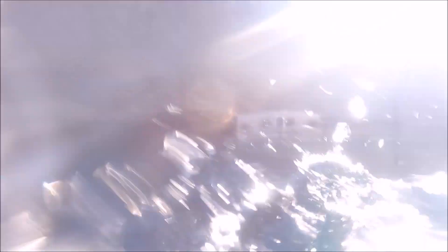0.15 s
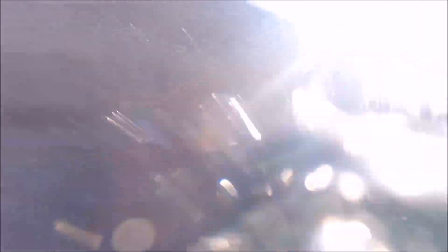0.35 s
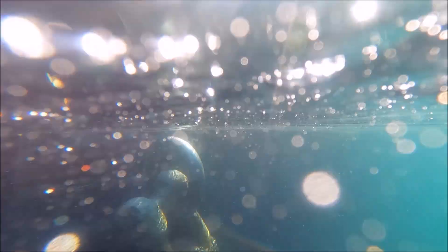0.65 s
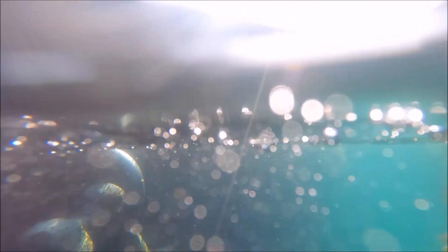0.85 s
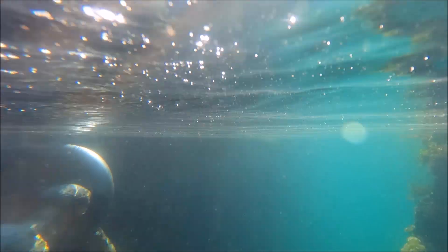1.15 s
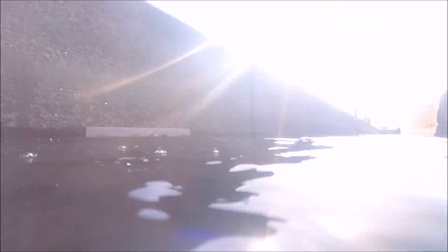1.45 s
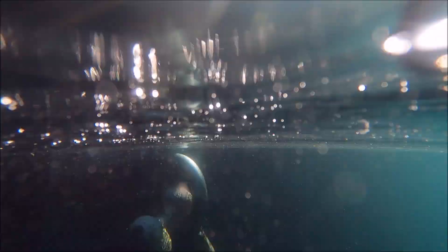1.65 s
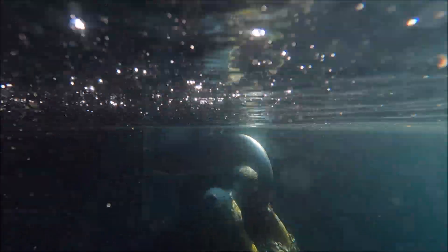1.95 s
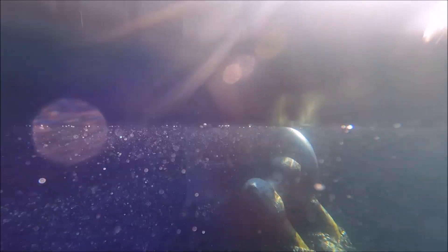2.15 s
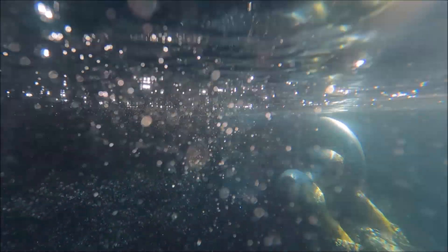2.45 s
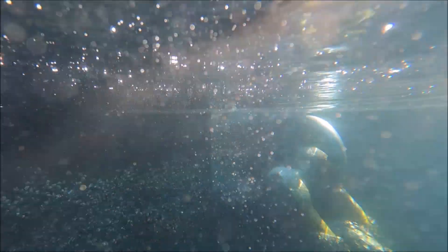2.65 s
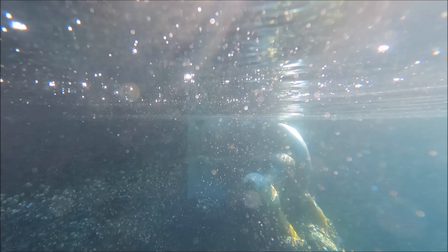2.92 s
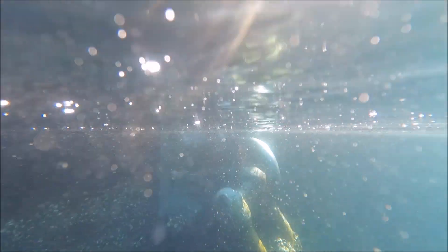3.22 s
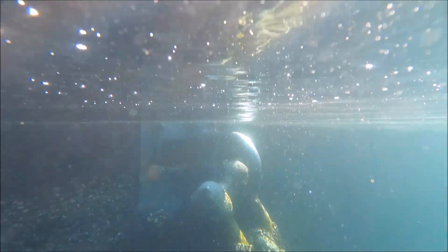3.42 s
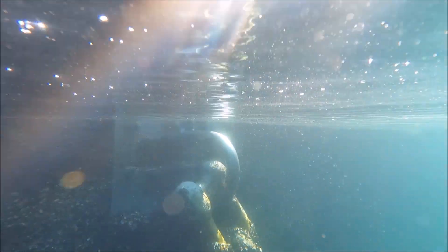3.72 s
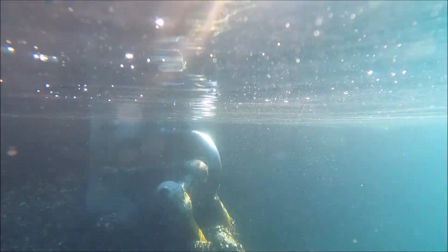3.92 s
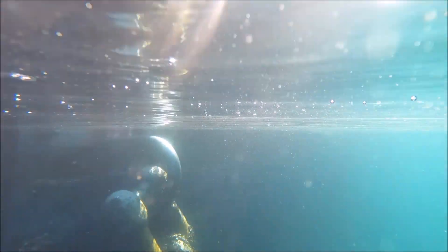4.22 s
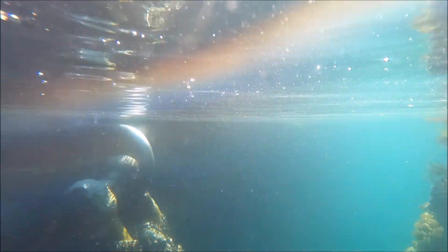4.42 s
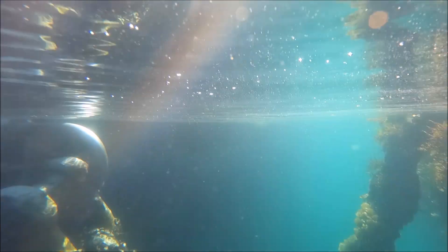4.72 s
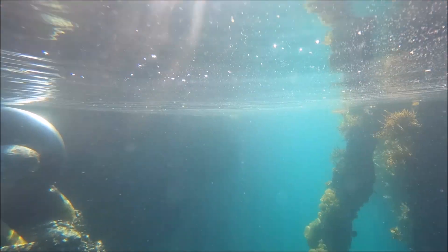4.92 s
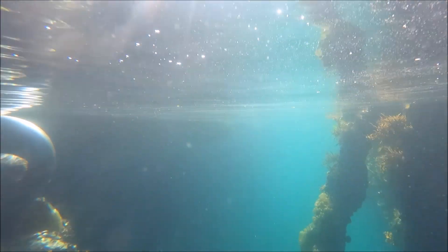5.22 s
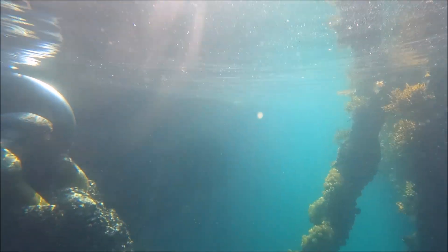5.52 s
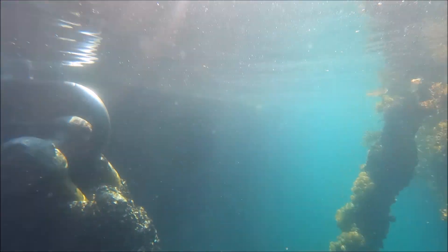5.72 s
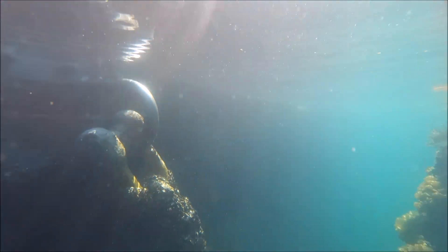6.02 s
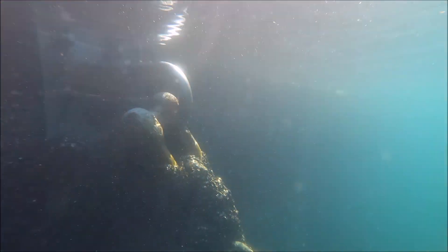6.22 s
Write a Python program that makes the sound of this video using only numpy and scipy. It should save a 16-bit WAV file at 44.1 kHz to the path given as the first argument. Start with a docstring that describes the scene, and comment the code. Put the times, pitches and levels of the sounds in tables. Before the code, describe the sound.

Water knocks directly on a camera casing: an abrupt opening cluster of slaps and low plops, scattered drips and froth, then hollow bubbling swirls as waves cover the microphone. The strongest glugging and deep thumping comes midway, followed by some bright knocks. Afterwards everything drops to a soft underwater background of far motor drone, faint rushing and tiny crackles.

```python
"""A waterproof camera bobs at the surface of a harbour and then sinks just below it.
At first water splashes on the case, as decaying puffs of bubble noise, and air plops and gulps as ringing sines.
Then each wave swirls past with a hollow note, a gliding sine, amid filtered-noise eddies, rumble and froth.
Once it is under, a far boat engine hums as wavering partials, its propeller rushes as coloured noise,
and a fine crackle like that of snapping shrimp is made of noise grains and short resonant puffs."""
import sys
import numpy as np
from scipy import signal
from scipy.fft import rfft, irfft, next_fast_len
from scipy.io import wavfile
from scipy.ndimage import uniform_filter1d

SR = 44100
rng = np.random.default_rng(int(sys.argv[2]) if len(sys.argv) > 2 else 0)


def to_wav(sig):
    """Store sig (one row per channel, or 1-D mono) as 16-bit WAV at the path in sys.argv[1].

    Samples outside -1..1 are clipped; the rate is SR.
    """
    pcm = np.clip(np.atleast_2d(sig), -1, 1) * 32767
    pcm = np.round(pcm).astype(np.int16)
    wavfile.write(sys.argv[1], SR, pcm.T)  # frames by channels


N = 280913
TIME = np.arange(N) / SR

# Bubbles that plop on or near the case, some to one side:
# start_s [s], pitch_hz [Hz, at the end of the swell], level_db [dB], swell_s [s], t60_s [s], left_right_db [dB]
PLOPS = [(0.0095, 1760, -13.5, 0.0027, 0.0052, 12), (0.0193, 1030, -27.5, 0.00063, 0.19, -20),
         (0.061, 633, -7, 0.0052, 0.01, 26), (0.086, 1190, -17.5, 0.00032, 0.035, -27),
         (0.092, 378, -4, 0.0013, 0.097, -6), (0.3561, 1104, -12.5, 0.0011, 0.037, -1.5),
         (0.3825, 953, -42, 0.0023, 0.086, -2), (0.4185, 1760, -40, 0.0042, 0.034, -3),
         (0.42, 1056, -44, 0.0052, 0.067, -1), (0.344, 3380, -40, 0.0033, 0.022, 1),
         (0.383, 5300, -48, 0.002, 0.015, 0.5), (0.5165, 5980, -37.5, 0.00053, 0.0087, 1),
         (0.5324, 2270, -30, 0.001, 0.02, -1), (0.539, 3740, -18.5, 0.00034, 0.0058, -3),
         (0.5589, 2710, -18, 0.00031, 0.0088, 3), (0.5566, 1180, -25, 0.0006, 0.032, 0),
         (0.557, 897, -29.5, 0.00083, 0.028, -2), (0.557, 2067, -29, 0.00069, 0.029, 3.5),
         (1.32, 1543, -31.5, 0.0025, 0.041, 2), (1.321, 2380, -31, 0.001, 0.028, 3),
         (1.322, 3870, -39, 0.00076, 0.06, 0), (1.323, 3400, -20.5, 0.00031, 0.025, 0),
         (1.323, 3090, -27.5, 0.0035, 0.048, -5), (2.032, 6200, -54, 0.0032, 0.033, 0),
         (3.698, 2236, -25.5, 0.0042, 0.012, 5), (3.712, 6700, -44, 0.00086, 0.012, 5),
         (4.5578, 6870, -28.5, 0.00065, 0.013, -15), (4.624, 1880, -52, 0.0023, 0.027, -4),
         (2.7533, 8020, -18, 0.0016, 0.0053, 2.5), (3.0145, 1504, -14.5, 0.0028, 0.017, 5),
         (3.0155, 2570, -24, 0.0021, 0.022, 5), (3.016, 5600, -37.5, 0.0012, 0.03, 4),
         (3.66, 3190, -38.5, 0.0017, 0.028, 0.5), (3.699, 1930, -24, 0.0012, 0.011, 5),
         (3.7, 2540, -26, 0.00081, 0.016, -1), (3.7, 3580, -34.5, 0.001, 0.011, 2),
         (4.5595, 2310, -35, 0.0012, 0.048, -2), (4.598, 1660, -45, 0.0012, 0.028, -8),
         (4.59, 524, -32, 0.003, 0.083, 0), (4.4628, 1660, -25, 0.0041, 0.013, -11),
         (4.4575, 576, -14.5, 0.011, 0.048, 5.5), (4.532, 1400, -22, 0.0037, 0.023, -7),
         (4.534, 2420, -30.5, 0.00098, 0.017, 7), (4.577, 3220, -32, 0.002, 0.034, -5),
         (4.5595, 542, -24.5, 0.0021, 0.061, 2)]
# Gulps of trapped air, pushes of water and a low sway of the camera on its mount, the same in both ports: #
# start_s [s], pitch_hz [Hz, at the end of the swell], level_db [dB], swell_s [s], t60_s [s]
GULPS = [(0.078, 40, -7.5, 0.0017, 0.11), (0.0923, 215, -6, 0.00046, 0.042),
         (0.2763, 99, -22.5, 0.0035, 0.022), (0.304, 118, -21.5, 0.0044, 0.018),
         (0.775, 543, -50, 0.008, 0.07), (0.84, 530, -49.5, 0.008, 0.096), (1.115, 578, -36, 0.007, 0.08),
         (1.165, 540, -37, 0.0054, 0.068), (1.595, 573.3, -42, 0.0033, 0.05), (2.7, 487, -24, 0.0045, 0.08),
         (2.712, 605, -35, 0.005, 0.09), (3.213, 654, -21.5, 0.0071, 0.16), (3.23, 290, -7.5, 0.0017, 0.12),
         (3.229, 483, -8.5, 0.004, 0.045), (3.2395, 482, -9.5, 0.0068, 0.064),
         (3.246, 38.34, -16.5, 0.015, 1), (3.258, 203, -18, 0.0066, 0.06), (3.264, 482, -8.5, 0.026, 0.061),
         (3.3, 600, -22, 0.0067, 0.082), (3.328, 268, -12, 0.0015, 0.026),
         (3.3315, 511, -11.5, 0.0028, 0.046), (3.333, 190, -15.5, 0.004, 0.07),
         (3.375, 519, -20, 0.0047, 0.12), (3.377, 605, -27, 0.0017, 0.069),
         (3.425, 498, -23.5, 0.017, 0.099), (3.512, 445, -19, 0.0042, 0.14), (3.6, 423, -24, 0.017, 0.26),
         (3.648, 443.3, -11.5, 0.0054, 0.19), (3.651, 296, -11.5, 0.0033, 0.13),
         (3.652, 560, -24, 0.0017, 0.055), (3.657, 143, -16.5, 0.0026, 0.051),
         (3.698, 438, -10, 0.0044, 0.13), (3.729, 411, -13, 0.0043, 0.074),
         (3.73, 590, -42, 0.00077, 0.028), (4.033, 586, -32.5, 0.0031, 0.067),
         (4.032, 277, -14, 0.004, 0.053), (4.054, 45.2, -17.5, 0.016, 0.15),
         (4.065, 267.5, -16.5, 0.0017, 0.1), (4.291, 489, -37.5, 0.01, 0.15),
         (4.65, 366, -39.5, 0.009, 0.08), (4.825, 424, -44.5, 0.015, 0.25),
         (4.941, 387.5, -37.5, 0.0056, 0.18), (4.945, 131, -39.5, 0.0079, 0.079),
         (5.25, 370, -45, 0.023, 0.29), (5.82, 205.5, -42, 0.02, 0.23), (6.32, 303, -44.5, 0.012, 0.12)]


def bubbles():
    """Volume resonance of trapped air: plops and gulps each ring at one pitch, as does the camera's low sway."""
    out = np.zeros((2, N))
    for start_s, pitch_hz, level_db, swell_s, t60_s, left_right_db in PLOPS:
        add(out, start_s, pan(left_right_db) * bubble(pitch_hz, level_db, swell_s, t60_s))
    for start_s, pitch_hz, level_db, swell_s, t60_s in GULPS:
        add(out, start_s, bubble(pitch_hz, level_db, swell_s, t60_s))
    return out


def bubble(pitch_hz, level_db, swell_s, t60_s, glide=0.0087, grit_db=-22):
    """Damped oscillation: a bubble swells as it pinches off, then rings down while its pitch creeps up."""
    t = np.arange(SR // 2) / SR
    swell = np.sin(np.pi / 2 * np.minimum(t / max(swell_s, 1e-4), 1)) ** 2
    shape = swell * amp(-60 * np.maximum(t - swell_s, 0) / t60_s)
    turns = np.cumsum(pitch_hz * (1 + glide * np.minimum((t - swell_s) / t60_s, 1))) / SR
    lowpass = signal.butter(7, 1.35 * pitch_hz, fs=SR, output="sos")
    grit = unit(signal.sosfilt(lowpass, rng.standard_normal(len(t))))
    return amp(level_db) * shape * (np.sin(2 * np.pi * turns) + amp(grit_db) * grit)


# The loudest slaps of water on the case, levels before the common trims:
# peak_s [s], level_db [dB], centre_hz [Hz], treble_db [dB], left_right_db [dB]
SPLATS = [(0.009, -23, 1830, -32, 0), (0.021, -33.5, 1060, -54.5, -6), (0.032, -32.5, 1100, -56, -1),
          (0.04, -31.5, 980, -52, -7), (0.062, -32.5, 990, -61, -2.5), (0.0843, -32, 1180, -55, 5),
          (0.094, -28.5, 905, -48.5, -14.5), (0.122, -38, 910, -65, 2), (0.134, -37.5, 1530, -63, -1),
          (0.145, -40, 1370, -67, 9), (0.257, -40.5, 1650, -51.5, -2), (0.277, -36, 1220, -46.5, 2.5),
          (0.306, -23.5, 1220, -50.5, -1), (0.325, -34, 1300, -47, 2), (0.356, -32.5, 750, -64, -2.5),
          (0.3852, -37.5, 960, -58, -1), (0.519, -31, 1070, -65, 0.5), (0.5357, -27.5, 3800, -63, 5),
          (0.538, -19.5, 1090, -65, 3), (0.546, -27, 1300, -69, 0), (0.5551, -34, 3300, -59, 9),
          (0.561, -34, 1330, -61, -5), (0.6147, -25.5, 950, -75, -1), (0.629, -38, 1110, -62.5, 4),
          (0.643, -43, 2000, -60.5, 0), (0.654, -58, 1400, -72, 3), (0.697, -42.5, 1730, -54, 0),
          (1.277, -38, 1493, -45, 0.5), (1.3252, -24, 1610, -48, -2), (1.8211, -43.5, 1210, -72, 5),
          (1.986, -31.5, 1860, -38, 4.5), (2.034, -34.5, 1500, -36.5, 1.5), (2.1038, -36, 1550, -53.5, 4.5),
          (2.4565, -37, 810, -74, 7), (2.7541, -25, 1440, -28, 7), (3.0155, -20.5, 2030, -43, -3),
          (3.23, -34, 994, -73.5, 0), (3.344, -36.5, 868, -64, 3), (3.402, -41.5, 1510, -54, 5),
          (3.5371, -32, 1440, -40, 3.5), (3.5657, -30, 1400, -31.5, 3), (3.6512, -29.5, 1100, -56, -10),
          (3.6613, -28.5, 3230, -61, 5), (3.698, -22, 2800, -56, 4.5), (3.7117, -34.5, 2500, -53, 26),
          (4.4585, -22, 1430, -24.5, -2.5), (4.5331, -19, 850, -36, 0), (4.5608, -19.5, 1440, -33, -4),
          (4.5793, -22.5, 2870, -32, 9), (4.59, -25.5, 2960, -32.5, -3), (4.5991, -25, 1530, -40, -13),
          (4.625, -28.5, 1540, -50, -2)]
# Resonances of the case, rung by every splat:
# mode_hz [Hz], half_width_hz [Hz, of each of two passes], level_db [dB, relative]
CASE = [(1000, 150, -52), (2610, 86, -19), (3300, 47, -28.5), (4320, 140, -22), (5250, 510, -20)]
# Colours of the slap and of its bright tick: frequency_hz [Hz], density_db [dB per Hz, relative]
SLAP = [(100, -19), (500, 22.5), (1000, 6.5), (1700, 8), (3400, 5), (5000, -2.5), (7000, -26), (10000, -56),
        (16000, -68.5)]
TICK = [(1500, -22.5), (4000, -18.5), (6000, 9.5), (8500, 4.5), (10500, -7.5), (16000, -16)]
# Likeness of the two ports in air and awash: frequency_hz [Hz], coherence [0 to 1]
IN_AIR = [(100, 0.55), (250, 0.51), (600, 0.94), (9000, 0.37)]
AWASH = [(100, 1), (500, 1), (1000, 0.99), (9000, 0.97)]


def splats(slap_db=0, tick_db=2, ring_share=0.51, ring_half_width_hz=330, tick_s=0.00067,
           rise_s=0.0014, t60_s=0.014, soft_db=-21, lead_in_s=0.012, die_away_s=0.014,
           linger_db=-34, linger_s=0.036):
    """Impact: a slap of bubble noise with a brief ring and bright tick, swelling softly and dying away."""
    out, t = np.zeros((2, N)), np.arange(-1024, 4096) / SR  # t = 0 is the peak
    before, after = np.maximum(-t, 0), np.maximum(t, 0)
    shape = np.exp(-before / rise_s - np.log(1000) * after / t60_s)
    shape += amp(soft_db) * np.exp(-before / lead_in_s - after / die_away_s)
    shape += amp(linger_db) * np.exp(-before / rise_s - after / linger_s)
    bubble_noise = steady(droplets(9000, 1.3, cycles=3.6, size=SR), 0.0078)
    for peak_s, level_db, centre_hz, treble_db, left_right_db in SPLATS:
        likeness = AWASH if 1 < peak_s < 4 else IN_AIR
        first = rng.integers(SR - len(t))  # each splat takes its own piece of the noise
        splash = shape * ports(bubble_noise[:, first:first + len(t)], likeness)
        ring = resonate_twice(splash, centre_hz, 2 * ring_half_width_hz)
        slap = (1 - ring_share) * unit(colour(splash, SLAP)) + ring_share * unit(ring)
        for mode_hz, half_width_hz, mode_db in CASE:
            slap += amp(mode_db) * unit(resonate_twice(splash, mode_hz, 2 * half_width_hz))
        hiss = ports(rng.standard_normal((2, len(t))), likeness)
        tick = colour(hiss * np.exp(-abs(t) / tick_s), TICK)
        sound = amp(level_db + slap_db) * slap / abs(slap).max()
        sound += amp(treble_db + tick_db) * tick / abs(tick).max()
        add(out, peak_s + t[0], pan(left_right_db) * sound[:, peak_s + t >= 0])
    return out


# Waves that close over the ports and trap air there, one curve each:
# start_s [s], pitch_hz [Hz, before the waver], level_db [dB, before the gurgle and trim]
POCKETS = [
    [(1.05, 489.7, -52), (1.118, 524.4, -40.5), (1.198, 488, -59), (1.23, 487.3, -36.5), (1.272, 478, -39),
     (1.316, 448, -30), (1.384, 453.7, -46.5), (1.438, 443.7, -36.5), (1.462, 454.3, -42), (1.51, 466, -25),
     (1.526, 486, -28.5), (1.56, 485, -46.5), (1.62, 469, -55.5), (1.64, 492, -68)],
    [(1.88, 501, -56), (1.926, 465, -39), (1.976, 448, -43.5), (2.002, 457, -35.5), (2.018, 452, -41),
     (2.044, 455, -47), (2.074, 451, -34.5), (2.158, 442, -63.5), (2.196, 463, -34), (2.3, 491, -57)],
    [(2.62, 523, -28), (2.656, 487.8, -52), (2.716, 480.4, -31), (2.738, 480, -27), (2.784, 461, -44.5),
     (2.832, 458.5, -29.5), (2.862, 470, -51), (2.882, 433.4, -34), (2.96, 438.5, -45.5),
     (3.006, 454.3, -26.5), (3.034, 456, -35.5), (3.186, 447.5, -40), (3.21, 436, -28)],
    [(3.75, 427, -19), (3.758, 429.4, -26.5), (3.928, 432.9, -42), (3.964, 428.8, -28),
     (4.004, 439.6, -45.5), (4.03, 445.8, -28), (4.064, 443, -23.5), (4.184, 425, -45.5),
     (4.21, 448.8, -41), (4.272, 451, -51), (4.308, 462, -42), (4.33, 465, -49)],
]


def pocket(pocket_db=-1.0, rough_db=-10, width_hz=170, waver=0.017, gurgle_db=3.38):
    """Cavity resonance: each wave keeps trapped air ringing, a hollow note of moving pitch with a rough edge."""
    out = np.zeros((1, N))
    sway, gurgle = 1 + waver * wander(30), amp(gurgle_db * wander(35))
    for curve in POCKETS:
        start_s, pitch_hz, level_db = np.transpose(curve)
        under = (TIME > start_s[0]) & (TIME < start_s[-1])
        hz = np.interp(TIME[under], start_s, pitch_hz) * sway[under]
        rough = rng.standard_normal((1, N))[:, under]
        for _ in range(3):
            rough = resonate(rough, hz, width_hz)
        tone = np.sqrt(2) * np.sin(2 * np.pi * np.cumsum(hz) / SR)
        note = tone + amp(rough_db) * unit(rough)
        gain = amp(pocket_db + np.interp(TIME[under], start_s, level_db))
        fade = signal.windows.tukey(len(hz), 0.1)
        out[:, under] += gain * gurgle[under] * fade * note
    return out


# Colours of the eddies and of the wave pressure: frequency_hz [Hz], density_db [dB per Hz, relative]
SWIRL = [(40, -26.5), (110, 3.5), (200, 1.5), (290, 4), (370, 4), (500, 0.5), (620, -4), (720, -21),
         (850, -48), (1200, -54), (2500, -52), (6000, -100)]
RUMBLE = [(8, -34), (22, -1.5), (38, -0.5), (47, -6), (62, -1.5), (85, -17.5), (140, -25), (400, -86),
          (2000, -100)]


def wash(swirl_db=-2, rumble_db=0, lumpy_db=2):
    """Turbulent pressure: eddies knock on the case; the waves' pressure rumbles below."""
    eddies = ports(crackle(650, 3.0) + 0.39 * rng.standard_normal((2, N)), AWASH)
    swirl = steady(colour(eddies, SWIRL), 0.14) * amp(lumpy_db * wander(28))
    rumble = steady(colour(rng.standard_normal((1, N)), RUMBLE, size=16384), 0.3)
    return amp(swirl_db) * flow() * swirl + amp(rumble_db) * flow(order=2) * rumble


# Flow of water past the case, before the trims:
# start_s [s], swirl_db [dB], rumble_db [dB]
FLOW = [(0, -28.5, -27), (0.2, -56.5, -58), (0.45, -58, -56.5), (1.04, -58, -60.5), (1.11, -39.5, -42),
        (1.35, -50, -46.5), (1.7, -55.5, -49.5), (2.02, -46, -40.5), (2.38, -53, -50), (2.75, -40, -41),
        (3.2, -44, -49.5), (3.27, -29.5, -21.5), (3.58, -36.5, -33), (4.2, -46, -43.5), (4.4, -56.5, -63),
        (4.92, -54.5, -50), (5.35, -60.5, -89), (6.37, -53.5, -83)]
# Sudden surges of water against the case, before the trims:
# peak_s [s], swirl_db [dB], rumble_db [dB], decay_s [s]
SURGES = [(0.087, -19, -31, 0.0062), (0.279, -36.5, -27.5, 0.02), (0.618, -46, -44, 0.032),
          (1.24, -37, -43, 0.0072), (1.326, -29.5, -33, 0.0094), (1.496, -30, -53, 0.016),
          (2.719, -33, -48, 0.018), (2.885, -34.5, -52, 0.0082), (3.24, -13.5, -41, 0.019),
          (3.336, -21, -33.5, 0.071), (3.659, -21, -28, 0.058), (4.058, -27, -29, 0.095),
          (4.59, -46, -42.5, 0.025), (4.956, -48, -56, 0.041), (5.58, -55, -51.5, 0.077),
          (5.838, -51, -41, 0.15)]


def flow(order=1, surge_rise_s=0.013):
    """Superposed flow: the strength of the swirl (1) or rumble (2) is the slow flow plus its surges."""
    gain = level(FLOW, order=order)
    for row in SURGES:
        peak_s, decay_s = row[0], row[3]
        gain += amp(row[order]) * held(peak_s, peak_s, surge_rise_s, decay_s)
    return gain


# Sheets of spray and foam thrown over the case:
# start_s [s, of full level], length_s [s, at full level], level_db [dB, before the trim]
SPRAYS = [(0.0, 0.013, -24.5), (0.024, 0.019, -37), (0.062, 0.033, -26.5), (0.118, 0.032, -44),
          (0.245, 0.15, -46), (0.387, 0.11, -63), (0.515, 0.052, -38.5), (0.612, 0.046, -46),
          (1.318, 0.013, -49), (2.993, 0.037, -59), (3.647, 0.091, -51.5), (4.553, 0.052, -51)]
# Colour of the foam: frequency_hz [Hz], density_db [dB per Hz, relative]
FOAM = [(300, 15), (700, 9), (1100, 12), (1800, 7), (2400, -11), (3200, -5.5), (5500, -21.5), (8000, -26.5),
        (10000, -43), (16000, -59.5)]


def spray(spray_db=-1, clump_db=1.0, rise_s=0.0022, fall_s=0.0066):
    """Random impacts: droplets and foam ping on the case in clumps around its splashes and hits."""
    drops = ports(droplets(1700, 4.2, cycles=6), IN_AIR)
    sheets = np.zeros(N)
    for start_s, length_s, level_db in SPRAYS:
        sheets += amp(level_db) * held(start_s, start_s + length_s, rise_s, fall_s)
    return amp(spray_db) * sheets * steady(colour(drops, FOAM), 0.024) * amp(clump_db * wander(90))


# Bubbles bursting around the half-sunk case, before the clumping:
# start_s [s], coarse_db [dB], froth_db [dB]
FIZZ = [(0.05, -66, -77.5), (0.45, -69, -83.5), (0.95, -76.5, -82), (1.16, -61, -77), (1.42, -68.5, -70),
        (1.6, -72.5, -82.5), (1.74, -67, -80), (1.84, -52, -76), (1.95, -65.5, -70.5), (2.2, -73, -75.5),
        (2.38, -70, -76), (2.45, -57.5, -72), (2.53, -64.5, -73.5), (2.66, -55, -66), (2.88, -66.5, -68),
        (3.04, -62.5, -61), (3.17, -68, -72), (3.25, -56, -65), (3.5, -65, -68), (3.67, -55.5, -62.5),
        (3.89, -72.5, -74), (4.08, -63, -65), (4.22, -71, -73.5), (4.6, -72, -64)]
# Colours of the coarse fizz and of the fine froth: frequency_hz [Hz], density_db [dB per Hz, relative]
COARSE = [(450, -8.5), (750, 3.5), (1000, -6), (1450, 3.5), (1850, -4), (2400, -16.5), (6000, -38),
          (12000, -77)]
FROTH = [(1200, -26.5), (2200, -1.5), (3000, 6), (4200, -2), (5500, -3), (6700, -5.5), (8500, -12),
         (11000, -30), (16000, -40)]


def fizz(coarse_db=0, froth_db=0, clump_db=2.5, grain=0.6):
    """Sum of many small sources: coarse bubbles and a fine froth burst around the case until it has sunk."""
    coarse = unit(colour(ports(droplets(2500, 2.0, cycles=2.5), AWASH), COARSE))
    ticks = crackle(260, 3.5)
    froth = unit(colour(ports(grain * ticks + rng.standard_normal((2, N)), AWASH), FROTH))
    both = amp(coarse_db) * level(FIZZ) * coarse + amp(froth_db) * level(FIZZ, order=2) * froth
    return both * amp(clump_db * wander(60))


# Stray bubbles that burst against the case:
# start_s [s], centre_hz [Hz], level_db [dB, peak of the tick]
DRIPS = [(0.213, 800, -50), (0.477, 2400, -50), (0.661, 5900, -67), (0.686, 1500, -46), (0.732, 3500, -61),
         (1.082, 1100, -54), (1.154, 1520, -44), (1.157, 3500, -59), (1.172, 1000, -55), (1.199, 2650, -49),
         (1.222, 2680, -56), (1.365, 2400, -46.5), (1.398, 1370, -49), (1.461, 3150, -48.5),
         (1.733, 2000, -48.5), (1.806, 1390, -50), (1.836, 1170, -42), (1.855, 1300, -63),
         (1.904, 3020, -52), (2.124, 1690, -48), (2.172, 3430, -58), (2.208, 3500, -51.5),
         (2.213, 6330, -59), (2.291, 5970, -57.5), (2.444, 1550, -43), (2.489, 4500, -60),
         (2.563, 1360, -46), (2.618, 1200, -46), (2.633, 1390, -46), (2.66, 1660, -42.5),
         (2.667, 3800, -52), (2.795, 1830, -40.5), (2.87, 3000, -44.5), (2.899, 1800, -48),
         (2.899, 5500, -52), (2.999, 2500, -30.5), (3.161, 4044, -53), (3.236, 3040, -39.5),
         (3.391, 5200, -45.5), (3.453, 2700, -44), (3.599, 5250, -45.5), (3.628, 5600, -51),
         (3.638, 1500, -35.5), (3.731, 4940, -50), (3.786, 2500, -60), (3.814, 3050, -54),
         (3.987, 2400, -47), (4.084, 2300, -52), (4.122, 2280, -56), (4.262, 4178, -48)]


def pops(drips_db=0, width_hz=1500, pop_s=0.0032, tail_db=-17, tail_s=0.011):
    """Impulse response: stray bubbles burst against the case, each a pitched tick with a brief fizzle."""
    out = np.zeros((2, N))
    for start_s, centre_hz, level_db in DRIPS:
        tick = burst(centre_hz, width_hz, pop_s, AWASH)
        fizzle = burst(centre_hz, 2 * width_hz, tail_s, AWASH)
        add(out, start_s, amp(level_db + drips_db) * (tick + amp(tail_db) * fizzle))
    return out


# The harbour heard under water, also read by the propeller and the shrimp:
# start_s [s], engine_db [dB, before the trims], hiss_db [dB, before the trim]
HARBOUR = [(4.45, -41.5, -74), (4.7, -50.5, -61.5), (5.0, -52, -62), (5.35, -48, -60), (5.65, -49, -56.5),
           (5.85, -44, -58), (6.1, -42, -58), (6.37, -40.5, -58)]
# Engine partials: pitch_hz [Hz, before the waver], level_db [dB, relative]
ENGINE = [(155, -43), (206, -40), (304, -42), (366, -37), (428, -37), (441.5, -34), (489.7, -31.5),
          (550.5, -31.5), (611, -54), (673, -48), (734.6, -48.5), (796.7, -46), (857, -55), (918, -61)]
# Colour of the hollow drone: frequency_hz [Hz], density_db [dB per Hz, relative]
DRONE = [(50, -8), (100, -19), (155, -6.5), (215, 1), (270, -1.5), (350, 2.5), (440, 16), (480, 1),
         (560, 1), (620, -26), (800, -26), (1050, -27), (1500, -47.5)]
# Likeness of the two ports once sunk: frequency_hz [Hz], coherence [0 to 1]
SUNK = [(60, 0.9), (250, 1), (500, 0.075), (2000, 0.21), (8400, 0.74)]


def engine(drone_db=-6, lines_db=-5, waver=0.0018, flutter_db=2, lean_db=-1, brighten=1.0):
    """Line spectrum: a far engine's wavering partials in a drone; high ones rise most as it grows louder."""
    drone = unit(colour(ports(rng.standard_normal((2, N)), SUNK), DRONE))
    clock, gain = np.cumsum(1 + waver * wander(3)) / SR, level(HARBOUR)
    nearness, lines = gain / gain.max(), 0
    for pitch_hz, level_db in ENGINE:
        # each port hears its own mix of paths, so its own phase
        turns = pitch_hz * clock + rng.random() + 0.38 * rng.random((2, 1))
        octaves_up = max(np.log2(pitch_hz / 440), 0)
        strength = amp(level_db + flutter_db * wander(3.2)) * nearness ** (brighten * octaves_up)
        lines += strength * np.sin(2 * np.pi * turns)
    full_rms = np.sqrt(sum(amp(level_db) ** 2 for _, level_db in ENGINE) / 2)
    return gain * pan(lean_db) * (amp(drone_db) * drone + amp(lines_db) * lines / full_rms)


# Colour of the propeller's rush: frequency_hz [Hz], density_db [dB per Hz, relative]
PROPELLER = [(450, -61), (620, 8), (800, 7), (1000, -12), (1350, 0), (1800, -20), (2200, 5.5), (2700, -31),
             (4000, -42)]


def propeller(rush_db=-58, growth=1.9):
    """Broadband flow noise: the propeller's rush comes up faster than the engine as the boat nears."""
    gain = level(HARBOUR)
    rush = unit(colour(ports(rng.standard_normal((2, N)), SUNK), PROPELLER))
    return amp(rush_db) * (gain / gain.max()) ** growth * rush


# The nearest shrimp snaps, some sharp and some smeared by echoes:
# start_s [s], peak_db [dB, before the trim], centre_hz [Hz, before the colour], decay_s [s]
SNAPS = [(4.7125, -46, 3300, 0.0061), (4.881, -50, 7800, .002), (4.985, -38.5, 6960, 0.0029),
         (5.117, -40, 4260, 0.016), (5.22, -43, 7700, 0.0028), (5.308, -38.5, 4240, 0.017),
         (5.4, -41.5, 7400, 0.0012), (5.496, -40, 5700, 0.003), (5.515, -43.5, 6500, 0.0025),
         (5.577, -41, 4170, 0.03), (5.61, -40, 4970, 0.0024), (5.659, -41.5, 4130, 0.024),
         (5.742, -42.5, 3930, 0.034), (5.801, -39, 6300, 0.0016), (5.908, -42, 6230, 0.0033),
         (6.019, -38.5, 2800, 0.022), (6.135, -43, 6660, 0.0044), (6.1818, -41.5, 4350, 0.023)]
# Colour of the snaps and their hiss: frequency_hz [Hz], density_db [dB per Hz, relative]
HISS = [(700, -16), (1050, -5.5), (1320, 5), (1550, 2.5), (1900, -1), (2150, -0.5), (2420, -2.5),
        (2680, 8.5), (2920, -0.5), (3150, 1.5), (4200, -6), (5000, -1), (7700, -5), (9500, -11.5),
        (11000, -25.5), (16000, -63)]


def shrimp(hiss_db=-2, near_db=-1, snap_width_hz=3200, swell_db=-1.1):
    """Incoherent summation: countless far snaps merge into a grainy hiss; nearer ones stand out."""
    grain = rng.standard_normal((2, N)) + .58 * droplets(700, 3.3, cycles=2.5)
    crowd = unit(colour(ports(grain, SUNK), HISS))
    out = amp(hiss_db + swell_db * wander(36)) * level(HARBOUR, order=2) * crowd
    for start_s, peak_db, centre_hz, decay_s in SNAPS:
        snap = colour(burst(centre_hz, snap_width_hz, decay_s, SUNK), HISS)
        add(out, start_s, amp(peak_db + near_db) * snap / abs(snap).max())
    return out


def droplets(per_s, spread_db, cycles, count=28, size=N):
    """Size sets pitch: tiny bubbles of many sizes each ping for a few cycles with a soft start."""
    clicks, t = crackle(per_s, spread_db, size=size), np.arange(SR // 40) / SR
    kind, out = rng.integers(0, count, size), np.zeros((2, size + len(t)))
    for k, hz in enumerate(np.geomspace(650, 10000, count)):
        age = hz * t / cycles
        ping = hz ** .75 * np.sin(2 * np.pi * hz * t) * (np.exp(-age) - np.exp(-4 * age))
        starts = np.flatnonzero(kind == k)
        for channel in range(2):
            for at in starts[clicks[channel, starts] != 0]:
                out[channel, at:at + len(t)] += clicks[channel, at] * ping
    return unit(out[:, :size])


def burst(hz, width_hz, decay_s, likeness, rise_s=0.0002):
    """Resonant filtering: a short puff of noise rings around hz, with peak 1."""
    t = np.arange(SR // 12) / SR
    puff = ports(rng.standard_normal((2, len(t))), likeness)
    puff = puff * np.exp(-t / decay_s) * (1 - np.exp(-t / rise_s))
    ring = resonate_twice(puff, hz, width_hz)
    return ring / abs(ring).max()


def crackle(per_s, spread_db, most=4, size=N):
    """Random arrivals: two trains of clicks, mostly small and a few large."""
    height = amp(spread_db * np.minimum(rng.exponential(1, (2, size)), most))
    sign = rng.choice([-1, 1], (2, size))
    return unit(height * sign * (rng.random((2, size)) < per_s / SR))


def resonate(x, hz, width_hz):
    """Heterodyne resonance: shifts hz to zero, smooths, and shifts back, with gain 1 at a moving hz."""
    turn = np.exp(2j * np.pi * np.cumsum(hz * np.ones(x.shape[1])) / SR)
    r = np.exp(-np.pi * width_hz / SR)
    return 2 * (turn * signal.lfilter([1 - r], [1, -r], x / turn + 1e-18)).real


def resonate_twice(x, hz, width_hz):
    """Cascaded resonance: two passes give steeper skirts."""
    return resonate(resonate(x, hz, width_hz), hz, width_hz)


def colour(x, points, size=4096):
    """Minimum-phase filtering: a causal filter with the given spectrum keeps attacks sharp."""
    log_gain = np.log(amp(read(points, abs(np.fft.fftfreq(size, 1 / SR)))))
    taps = np.fft.ifft(np.exp(np.conj(signal.hilbert(log_gain)))).real[:size // 2]
    return signal.fftconvolve(x, taps[None], axes=1)[:, :x.shape[1]]


def ports(pair, likeness):
    """Spatial coherence: blends two unrelated sounds into what the two ports hear."""
    count = next_fast_len(pair.shape[1], True)
    same = np.clip(read(likeness, np.fft.rfftfreq(count, 1 / SR)), 0, 1)
    mid, side = rfft(pair, count) * np.sqrt([(1 + same) / 2, (1 - same) / 2])
    return irfft(np.array([mid + side, mid - side]), count)[:, :pair.shape[1]]


def steady(x, span_s):
    """Level normalisation: evens out the chance swells of a noise that last longer than span_s."""
    size = max(int(span_s * SR), 2)
    power = uniform_filter1d(uniform_filter1d((x ** 2).mean(0), size), size)
    return x / np.sqrt(abs(power) + 1e-12)


def wander(rate_hz):
    """Low-pass noise: a slow random drift of rms 1 that rolls off above rate_hz."""
    count = 2048
    hz = np.fft.rfftfreq(count, N / SR / count)
    slow = irfft(rfft(rng.standard_normal(count)) / (1 + (hz / rate_hz) ** 4), count)
    return np.interp(TIME, np.linspace(0, N / SR, count), unit(slow))


def held(start_s, end_s, rise_s, fall_s):
    """Exponential envelope: a rise up to start_s, a hold until end_s, then a release."""
    return np.exp(-np.maximum(start_s - TIME, 0) / rise_s - np.maximum(TIME - end_s, 0) / fall_s)


def level(rows, order=1):
    """Decibel interpolation: gain over time from one column of a curve, fading out beyond its ends."""
    rows = np.asarray(rows)
    outside_s = np.maximum(rows[0, 0] - TIME, 0) + np.maximum(TIME - rows[-1, 0], 0)
    return amp(np.interp(TIME, rows[:, 0], rows[:, order])) * np.exp(-outside_s / .06)


def read(points, hz):
    """Logarithmic frequency scale: reads a spectrum between its points."""
    f, value = np.transpose(points)
    return np.interp(np.log(hz + 1), np.log(f), value)


def pan(left_right_db):
    """Level difference between channels: left and right gains with a mean of 1."""
    gains = amp([[left_right_db / 2], [-left_right_db / 2]])
    return gains / gains.mean()


def add(mix, start_s, sound):
    """Superposition: adds a sound into the mix at start_s."""
    part = mix[:, max(round(start_s * SR), 0):][:, :sound.shape[-1]]
    part += sound[..., :part.shape[-1]]


def amp(db):
    """Logarithmic level: decibels to gain."""
    return 10 ** (np.asarray(db) / 20)


def unit(x):
    """Effective value: scales to rms 1."""
    return x / np.sqrt(np.mean(x ** 2) + 1e-20)


def scene():
    """Superposition of sources: water and air on the case, then the harbour below."""
    at_case = bubbles() + splats() + pocket() + wash() + spray() + fizz() + pops()
    return at_case + engine() + propeller() + shrimp()


def record(dry, cutoff_hz=15900):
    """Clipping and band limitation: peaks stop at full scale, then a low-pass removes the top."""
    lowpass = signal.firwin(511, cutoff_hz, window=("kaiser", 9), fs=SR)
    return signal.oaconvolve(np.clip(dry, -1, 1), lowpass[None], "same")


dry = scene()
out = record(dry)
to_wav(out)
```